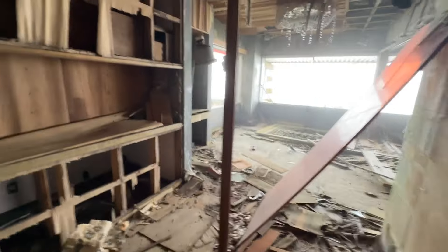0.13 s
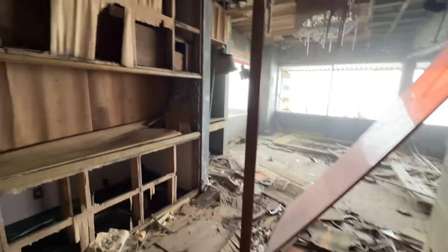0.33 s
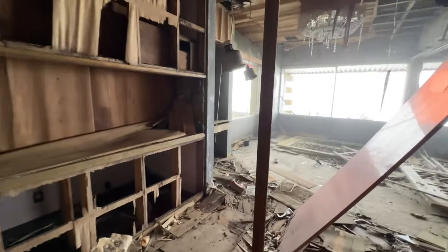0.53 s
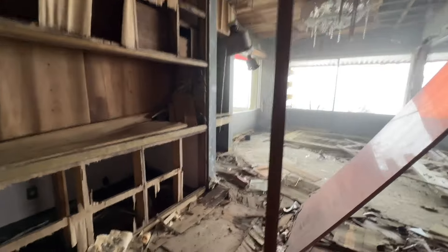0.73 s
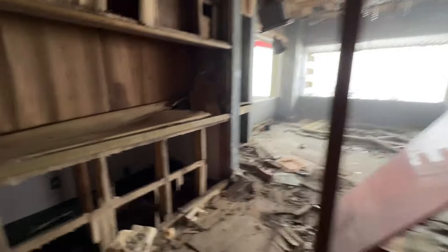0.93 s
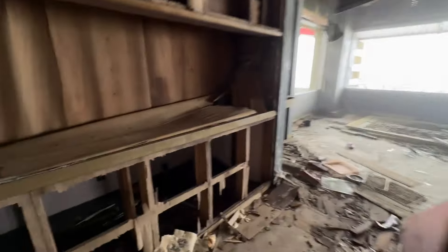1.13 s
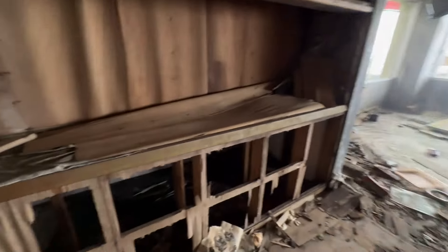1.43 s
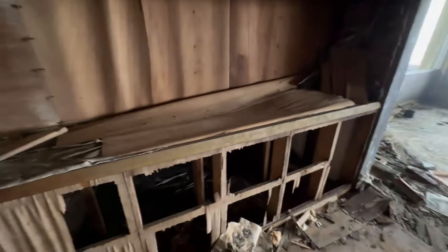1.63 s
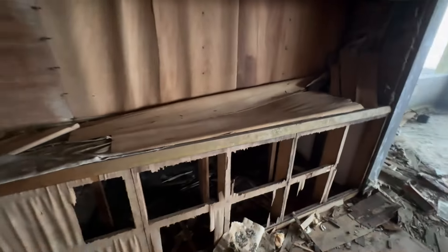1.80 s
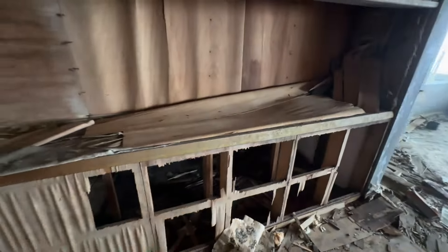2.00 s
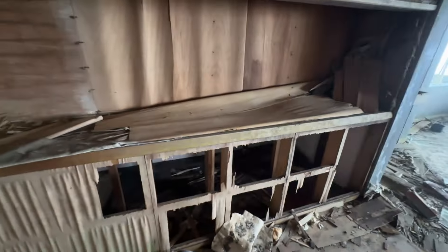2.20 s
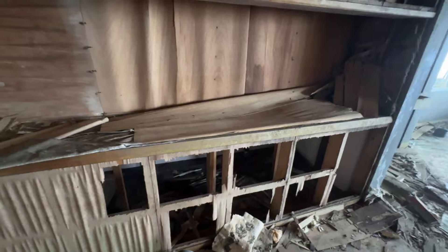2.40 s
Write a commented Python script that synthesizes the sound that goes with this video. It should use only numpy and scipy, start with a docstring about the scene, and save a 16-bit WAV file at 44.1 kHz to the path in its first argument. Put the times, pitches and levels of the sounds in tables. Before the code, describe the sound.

Footsteps on broken boards and plaster: a light click and knock, a few small snaps, a quiet gap, then a loud burst of wooden clacks and gritty crunches, close to a hand-held microphone in a bare, gutted room.

```python
"""Footsteps on debris in a gutted building, heard by a hand-held camera microphone.
Shoes knock loose boards, which ring in damped modes over a hollow; plaster chips snap as resonant
clicks, grit crunches as dense tiny fractures, and the slab thuds softly under the walker. Clothes rustle
as patchy noise. Hiss and rumble come through the empty windows, and the bare room answers the debris
with short echoes and a diffuse tail."""
import sys
import numpy as np
from scipy import signal
from scipy.fft import rfft, irfft, next_fast_len
from scipy.io import wavfile
from scipy.ndimage import uniform_filter1d

SR = 44100
rng = np.random.default_rng(int(sys.argv[2]) if len(sys.argv) > 2 else 0)


def wav_record(signal):
    """Record a signal, one row per channel, as 16-bit PCM in the file named by sys.argv[1]."""
    frames = np.transpose(np.atleast_2d(signal))
    bounded = np.clip(frames, -1, 1)
    # unit amplitude maps onto the largest positive 16-bit level
    quanta = np.round(bounded * 32767).astype(np.int16)
    wavfile.write(sys.argv[1], SR, quanta)


def elevation(decibels):
    """Turn decibel levels (scalar or array-like) into linear amplitude ratios."""
    levels = np.asarray(decibels, float)
    return 10 ** (levels / 20)


N = 112454  # length in samples

# Outside air. Each row: frequency in Hz, relative density in dB per Hz.
AIR_SPECTRUM = [(65, -18), (110, 4), (228, -0.5), (264, -5.5), (305, -4), (1070, -10.5), (1550, -8),
                (1790, -14), (2260, -16.5), (4130, -18), (10100, -31.5), (16000, -59)]
# Swell of the air. Each row: time in seconds, rms level in dB ahead of the microphone.
AIR_LEVEL = [(0.0, -53), (0.47, -55), (0.86, -50.5), (1.55, -59.5), (1.67, -43), (1.96, -45), (2.23, -55),
             (2.55, -60)]
# Low rumble from outside. Each row: frequency in Hz, relative density in dB per Hz.
RUMBLE_SPECTRUM = [(15, -61.5), (25, -33.5), (43, -29), (47, -28.5), (59, 9.5), (130, -12), (170, -34),
                   (290, -120)]
# Swell of the rumble. Each row: time in seconds, rms level in dB ahead of the microphone.
RUMBLE_LEVEL = [(0.0, -56), (0.55, -59.5), (0.85, -55), (1.4, -59), (1.67, -51), (2.55, -60)]
# Clothes moving, one list per spell of rustle. Each row: time in seconds, relative level in dB.
RUSTLE_SPELLS = [
    [(0.0, -63.5), (0.156, -60.5), (0.356, -75.5), (0.376, -69), (0.64, -75), (0.694, -129.5), (0.73, -81)],
    [(1.08, -74), (1.124, -76), (1.27, -62), (1.326, -66.5), (1.45, -73.5), (1.502, -77), (1.505, -70)],
]
# Cloth on cloth. Each row: frequency in Hz, relative density in dB per Hz.
CLOTH_SPECTRUM = [(600, -29), (1200, -6), (2500, -11.5), (5000, -5.5), (9500, -9), (11500, -8),
                  (16000, -16)]
# Plaster chips snapping, some with a strong echo about 13 ms later, given its own row.
# Each row: start in seconds, peak in dB ahead of room and microphone, centre of the resonance in Hz,
# its width in Hz.
SNAPS = [(.738, -34, 5000, 4030), (0.7557, -5.5, 9500, 4830), (0.7574, -9, 2130, 2370),
         (0.9274, -12.5, 6200, 2990), (.9405, -19, 6500, 3500), (0.9939, -13.5, 9100, 7900),
         (1.069, -32, 11900, 5000), (1.5112, -23.5, 1730, 1200), (1.5237, -25, 1310, 900),
         (1.7462, -2.5, 2000, 1790), (1.832, -9.5, 2000, 3000), (1.8518, 3.5, 1840, 800),
         (1.8822, 6, 4000, 4000), (1.8959, -4, 2060, 2500), (1.968, -10.5, 2400, 2480),
         (2.0138, -14, 3500, 5260), (2.121, -18, 2020, 920), (2.1696, -13, 2200, 920),
         (2.3419, -27, 2400, 910)]
# Boards knocked by a shoe, some with a strong echo about 11 ms later, given its own row.
# Each row: start in seconds, relative level in dB, contact time in ms (taken as 0.1 at least),
# hollow boom relative to the knock in dB, pitch ratio of the board.
KNOCKS = [(.740, -24, 0.35, -19, 1.8), (.7568, -15, 0.22, -3.5, 1.17), (1.129, -36, 0.47, -4, 0.7),
          (1.5112, -18.5, 0.11, 0, 1.3), (1.5222, -25, 0.23, 10, 1.52), (1.556, -15, 0.51, -6, 0.99),
          (1.574, -29, 0.85, 13, 1.1), (1.637, -24, 0.45, 0, 1.6), (1.7455, 1, .33, -3, 1.2),
          (1.7566, -7, 0.13, -16, 1.5), (1.832, -22, 0.1, -37, 3), (1.880, -13, 0.2, -11, 1.03),
          (1.895, -17.5, .4, 9, 1.9), (2.0235, -9.5, 0.28, -6.5, 1.25), (2.06, -30, 0.14, -32, 1.2),
          (2.1685, -37, 0.076, -11, 1.8)]
# Modes of a loose board. Each row: frequency in Hz at pitch ratio 1, mean relative level in dB,
# time to fall 60 dB in seconds.
BOARD_MODES = [(282, -48, 0.029), (464, -14, 0.067), (476, -11.5, 0.037), (603, -10, 0.063),
               (674, -7, 0.022), (900, -8.5, 0.054), (840, -13, 0.022), (1147, -11, 0.057),
               (1500, -53, 0.036), (1630, -54, .04), (2180, -55, .04), (2260, -52, 0.056)]
# The walker's weight landing on the slab. Each row: start in seconds, relative level in dB,
# time to fall 60 dB in seconds.
THUDS = [(.76, -44, 0.16), (.9, -39, 0.53), (1.522, -33, 0.37), (1.748, -37, 0.17), (1.88, -45, .2),
         (2.029, -59, .2)]
# Grit crushed under a sole. Each row: start in seconds, rise in seconds, time to fall 60 dB in seconds,
# relative level in dB, spectral tilt in dB per octave.
CRUNCHES = [(0.781, 0.017, 0.88, -55.5, -0.5), (.995, 0.0032, 0.32, -46.5, 1.6),
            (1.5105, 0.012, 0.27, -35.5, -6.5), (1.548, 0.008, 0.31, -42.5, 3.1),
            (1.615, 0.014, 0.088, -40, 1.8), (1.651, 0.0039, 0.13, -41, 7.5),
            (1.703, 0.0099, 0.083, -45, 2.5), (1.735, 0.017, 0.055, -13, -6.5),
            (1.8316, .004, .14, -25.5, -4.8), (1.858, 0.01, 0.17, -26, -2), (1.876, 0.0052, 0.14, -20.5, 0),
            (1.9672, 0.0022, 0.077, -28, 2.4), (2.0132, 0.0066, 0.063, -18.5, -0.2),
            (2.058, 0.011, 0.12, -32.5, -0.2), (2.126, 0.0053, 0.082, -40.5, -1),
            (2.169, 0.0072, 0.069, -37.5, 0.8), (2.34, 0.0044, 0.11, -51, 1.8)]
# Fracturing grit before tilt. Each row: frequency in Hz, relative density in dB per Hz.
GRIT_SPECTRUM = [(200, -34), (400, -9.5), (800, -4.5), (1500, -6.5), (2500, -11), (4500, -10), (8000, -11),
                 (12000, -14), (16000, -22)]
# Diffuse tail of the bare room. Each row: frequency in Hz, time to fall 60 dB in seconds.
ROOM_DECAY = [(150, 0.36), (500, 0.22), (2000, 0.15), (6000, 0.17), (14000, 0.11)]
# Echoes off near surfaces. Each row: delay in seconds, level in dB relative to the direct sound.
WALLS = [(.003, -7), (.0062, -11), (.0125, -12)]
# Microphone response. Each row: frequency in Hz, gain in dB.
MIC = [(30, -5), (60, 1), (1700, 3.5), (2300, 7.5), (2900, 3), (6000, 1.5), (10200, 3.5), (11200, -2),
       (14000, -1), (15300, -0.5)]

# less room on boards, so their ringing stays short and clear
ROOM_DB, BOARD_ROOM_DB, ROOM_BUILD_S = 0, -5, .003
SNAP_T60_S, SNAP_ROUGHNESS = .0015, .15
SNAP_SHOULDER_DB = -13  # flat part of a click under its resonance
RADIATES_HZ = 230  # loose boards push little air below this
RATTLE_DB, RATTLE_T60_S = -8.5, .03
KNOCK_DB, MODE_SCATTER_DB = 1, 2.5
BOOM_HZ, BOOM_DB, BOOM_RISE_S, BOOM_T60_S = 163.8, -7.5, .021, .17  # hollow under the boards
THUD_HZ, THUD_RISE_S = 74.3, .005
GRAINS_PER_S, GRAIN_SPREAD_DB, RISE_POWER = 3000, 3.5, 1.3
LOW_HZ, TOP_HZ = 38, 15900  # ends of the band
T = np.arange(SR // 2) / SR  # seconds after an event


def unit(x):
    """Scales x to rms 1."""
    return x / np.sqrt(np.mean(x ** 2) + 1e-20)


def along(points, hz):
    """Reads (Hz, value) points on a log frequency axis."""
    f, v = np.transpose(points)
    return np.interp(np.log(hz + 1), np.log(f + 1), v)


def level(rows):
    """Gain per sample from (seconds, dB) rows, at -120 dB outside them."""
    s, db = np.transpose(rows)
    return elevation(np.interp(np.arange(N) / SR, s, db, left=-120, right=-120))


def coloured(x, db_of_hz):
    """Passes x through a causal minimum-phase filter of the given gain, by folding its cepstrum."""
    m = 2 * next_fast_len(len(x))
    gain = elevation(db_of_hz(np.fft.rfftfreq(m, 1 / SR)))
    cepstrum = irfft(np.log(np.maximum(gain, 1e-6)), m)
    cepstrum[1:m // 2] *= 2
    cepstrum[m // 2 + 1:] = 0
    return irfft(rfft(x, m) * np.exp(rfft(cepstrum)), m)[:len(x)]


def patchy(spectrum, patchy_db):
    """Coloured noise of rms 1 with patches of random gain over time and frequency."""
    z = signal.stft(rng.standard_normal(N), nperseg=512)[2]
    field = uniform_filter1d(rng.standard_normal(z.shape), size=6, axis=0)
    field = uniform_filter1d(field, size=10, axis=1)
    noise = signal.istft(z * elevation(patchy_db * unit(field)), nperseg=512)[1][:N]
    return unit(coloured(noise, lambda hz: along(spectrum, hz)))


def add_dry(out, sound, s):
    """Lays a sound at s seconds with no room on it."""
    out[round(s * SR):][:len(T)] += sound


def add_in_room(out, sound, s, room_db=ROOM_DB):
    """Lays a sound at s seconds with wall echoes and a fresh diffuse tail of decaying noise."""
    hz, t, z = signal.stft(rng.standard_normal(len(T)), SR, nperseg=256)
    decay = elevation(-60 * t / along(ROOM_DECAY, hz)[:, None])
    tail = signal.istft(z * decay, SR, nperseg=256)[1][:len(T)]
    tail = tail * (1 - np.exp(-T / ROOM_BUILD_S))
    room = elevation(room_db) * tail / np.linalg.norm(tail) + (T == 0)  # T == 0 is the direct sound
    for delay, db in WALLS:
        room[round(delay * SR)] += elevation(db)
    add_dry(out, signal.fftconvolve(sound, room)[:len(T)], s)


def air():
    """Outside hiss and a low rumble through the empty windows: two noises with slow swells."""
    hiss = level(AIR_LEVEL) * patchy(AIR_SPECTRUM, patchy_db=1.2)
    rumble = level(RUMBLE_LEVEL) * patchy(RUMBLE_SPECTRUM, patchy_db=0)
    return hiss + rumble


def clothes():
    """Soft rustle of the walker's clothes between steps: noise in strongly uneven patches."""
    swell = sum(level(rows) for rows in RUSTLE_SPELLS)
    return swell * elevation(5.5) * patchy(CLOTH_SPECTRUM, patchy_db=5.0)


def plaster():
    """Each snap is a slightly rough click through one broad resonance of the chip."""
    out = np.zeros(N + SR)
    for s, db, centre_hz, width_hz in SNAPS:
        click = (T == 0) + SNAP_ROUGHNESS * rng.standard_normal(len(T))
        click = click * elevation(-60 * T / SNAP_T60_S)

        def chip_db(hz):
            f = hz + 1
            resonance = 1 / (1 + ((f * f - centre_hz ** 2) / (f * width_hz)) ** 2)
            low_fall = 12 * np.minimum(np.log2(f / 600), 0)  # 12 dB per octave below 600 Hz
            return 10 * np.log10(resonance + elevation(SNAP_SHOULDER_DB) ** 2) + low_fall

        snap = coloured(click, chip_db)
        add_in_room(out, elevation(db) * snap / np.abs(snap).max(), s)
    return out[:N]


def boards():
    """A rounded push and a short rattle ring the board's modes; the hollow below booms with them."""
    out = np.zeros(N + SR)
    radiation = signal.butter(3, RADIATES_HZ, "high", fs=SR, output="sos")
    for s, db, contact_ms, boom_db, ratio in KNOCKS:
        contact_s = max(contact_ms, .1) / 1000
        push = T / contact_s * np.exp(-T / contact_s)
        rattle = rng.standard_normal(len(T)) * elevation(-60 * T / RATTLE_T60_S)
        contacts = (T == 0) + elevation(RATTLE_DB) * rattle / np.linalg.norm(rattle)
        force = signal.fftconvolve(push / push.sum(), contacts)[:len(T)]
        ring = np.zeros(len(T))
        for hz, mode_db, t60 in BOARD_MODES:
            mode_db = mode_db + rng.normal(0, MODE_SCATTER_DB)  # mode levels vary from knock to knock
            ring += elevation(mode_db - 60 * T / t60) * np.sin(2 * np.pi * ratio * hz * T)
        knock = signal.sosfilt(radiation, signal.fftconvolve(force, ring)[:len(T)])
        add_in_room(out, elevation(db + KNOCK_DB) * knock, s, BOARD_ROOM_DB)
        boom = (1 - np.exp(-T / BOOM_RISE_S)) * elevation(-60 * T / BOOM_T60_S)
        boom = boom * np.sin(2 * np.pi * BOOM_HZ * T)
        add_dry(out, elevation(db + BOOM_DB + boom_db) * boom, s)
    return out[:N]


def slab():
    """A soft low thud under each shift of weight: one decaying sine with a rounded start."""
    out = np.zeros(N + SR)
    for s, db, t60 in THUDS:
        swell = (1 - np.exp(-T / THUD_RISE_S)) * elevation(db - 60 * T / t60)
        add_dry(out, swell * np.sin(2 * np.pi * THUD_HZ * T), s)
    return out[:N]


def grit():
    """Dense tiny fractures of uneven size, swelling and fading with the pressure of the sole."""
    out = np.zeros(N + SR)
    for s, rise, t60, db, tilt_db in CRUNCHES:
        chance, size, sign = rng.random((3, len(T)))
        sizes = elevation(-GRAIN_SPREAD_DB * np.log(size + 3e-2))  # few large, many small
        grains = (chance < GRAINS_PER_S / SR) * sizes * np.sign(sign - .5)
        grains = unit(coloured(
            grains, lambda hz: along(GRIT_SPECTRUM, hz) + tilt_db * np.log2((hz + 100) / 3000)))
        swell = np.minimum(T / rise, 1) ** RISE_POWER
        fade = elevation(-60 * np.maximum(T - rise, 0) / t60)
        add_in_room(out, elevation(db) * grains * swell * fade, s)
    return out[:N]


def scene():
    """All sources at the microphone, one channel."""
    return (air() + clothes() + plaster() + boards() + slab() + grit())[None]


def roll_off(x):
    """The treble ends steeply here."""
    return signal.sosfilt(signal.butter(12, 16810, fs=SR, output="sos"), x)


def record(dry):
    """Microphone colour, soft clipping at full scale, then the limits of the band."""
    x = coloured(dry[0], lambda hz: along(MIC, hz))[None]
    x = x / (1 + np.abs(x) ** 8) ** (1 / 8)
    hz = np.fft.rfftfreq(N, 1 / SR)
    low_cut = hz ** 2 / (hz ** 2 + LOW_HZ ** 2)
    mix = irfft(rfft(x) * (hz < TOP_HZ) * low_cut, N)
    return roll_off(mix)


dry = scene()
out = record(dry)
wav_record(out)
```